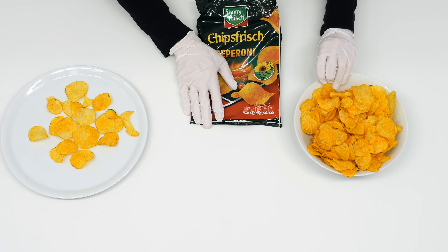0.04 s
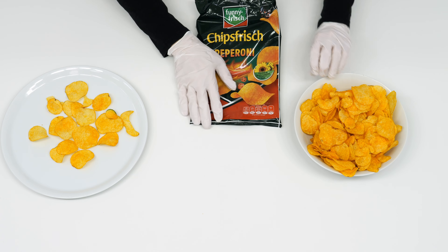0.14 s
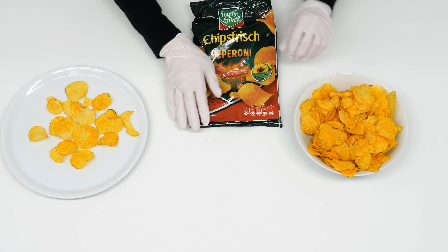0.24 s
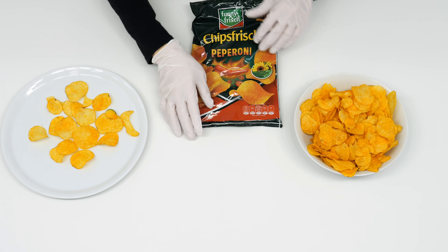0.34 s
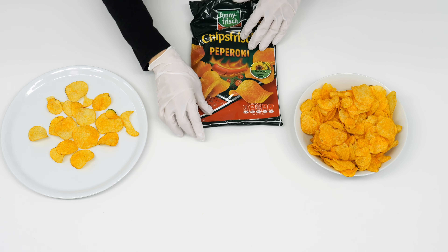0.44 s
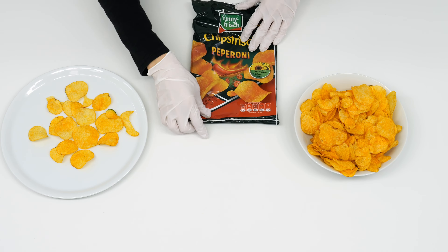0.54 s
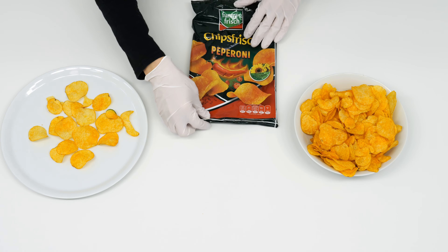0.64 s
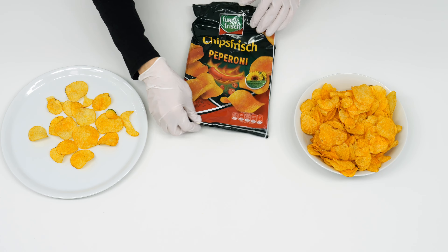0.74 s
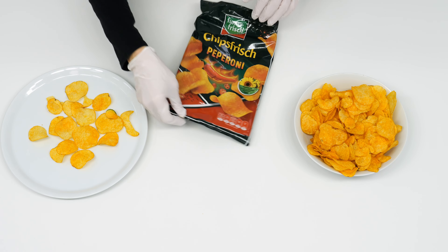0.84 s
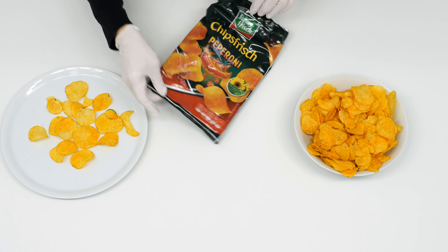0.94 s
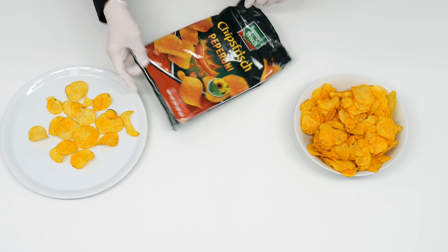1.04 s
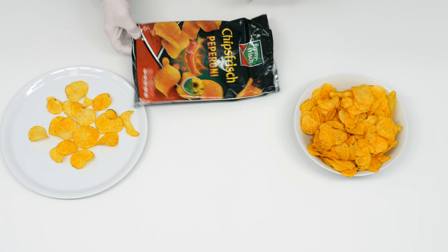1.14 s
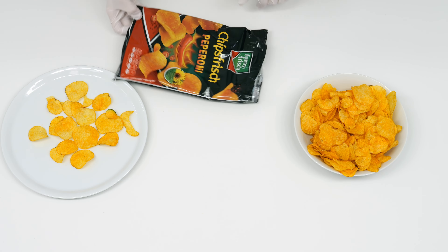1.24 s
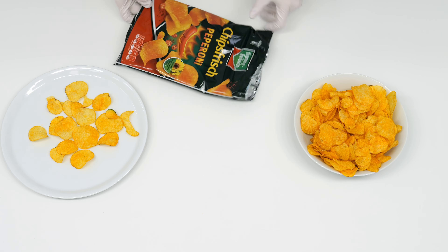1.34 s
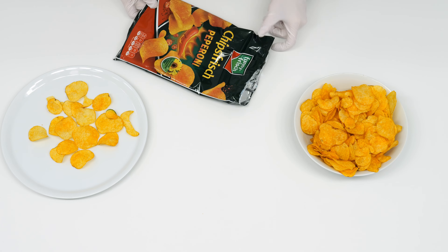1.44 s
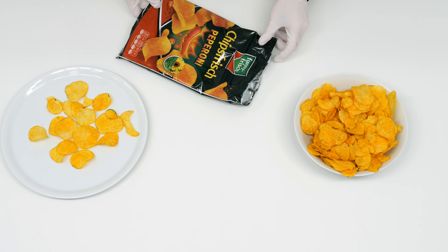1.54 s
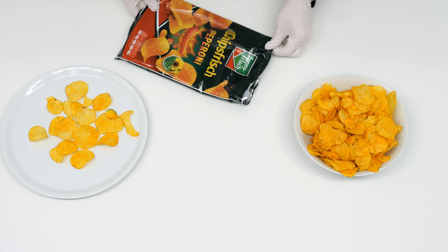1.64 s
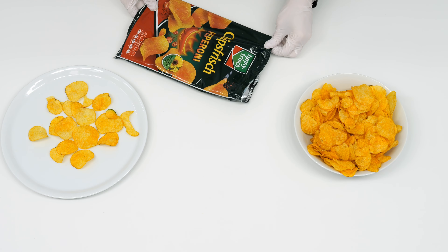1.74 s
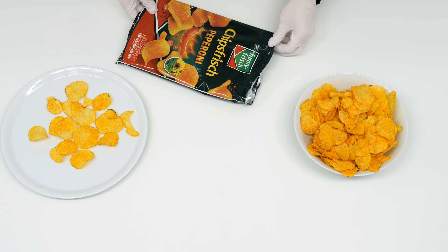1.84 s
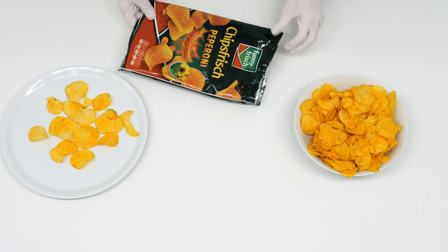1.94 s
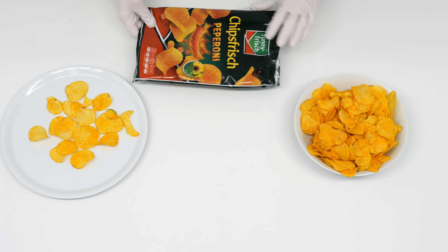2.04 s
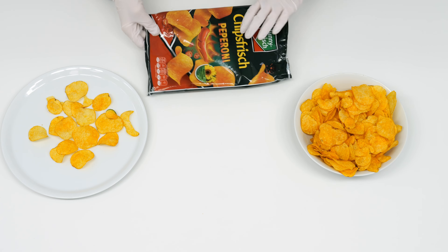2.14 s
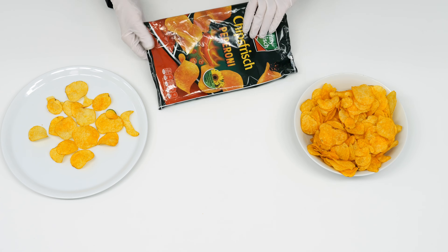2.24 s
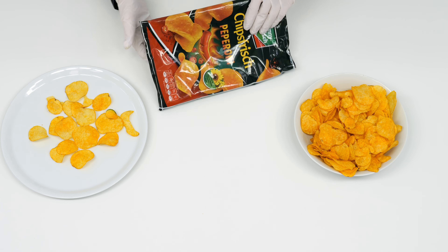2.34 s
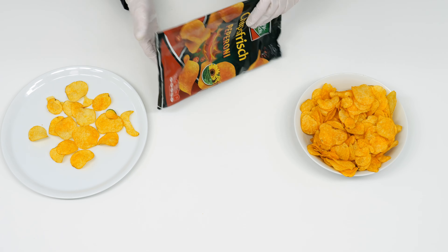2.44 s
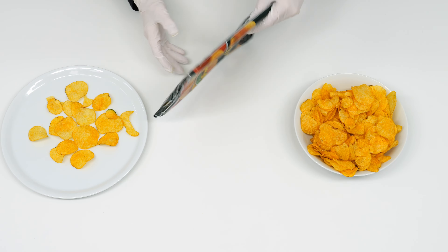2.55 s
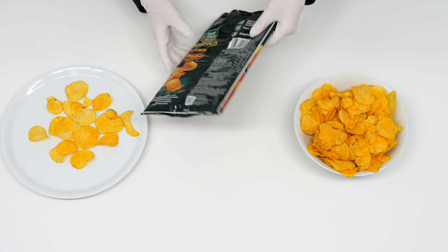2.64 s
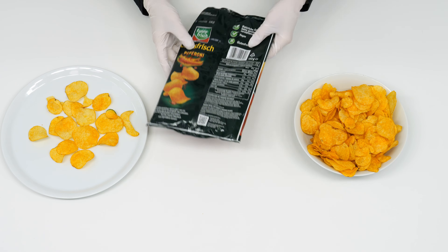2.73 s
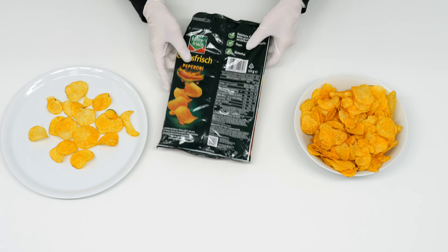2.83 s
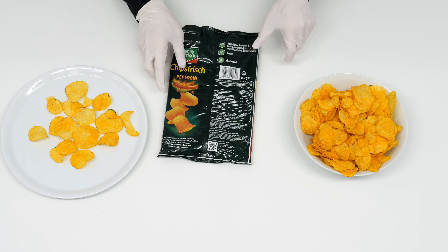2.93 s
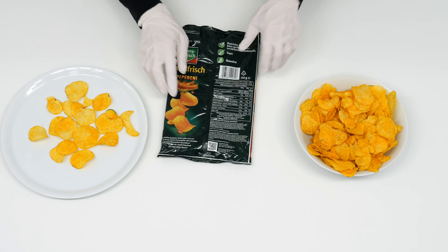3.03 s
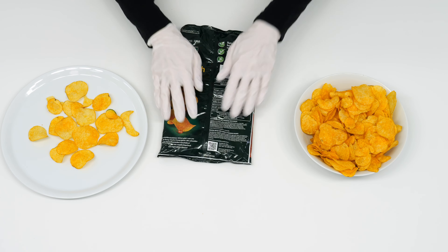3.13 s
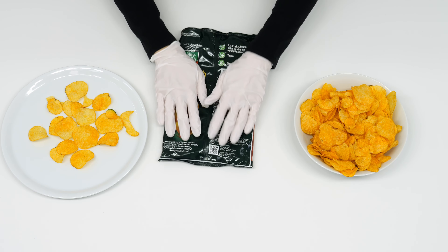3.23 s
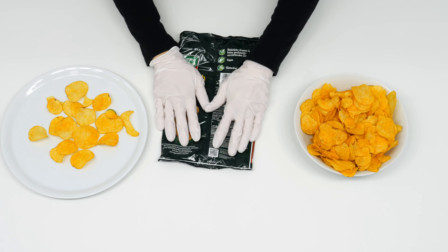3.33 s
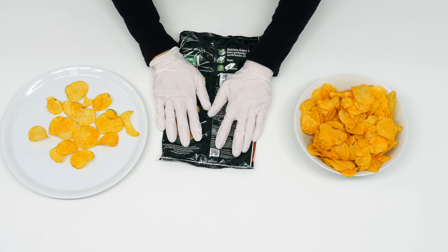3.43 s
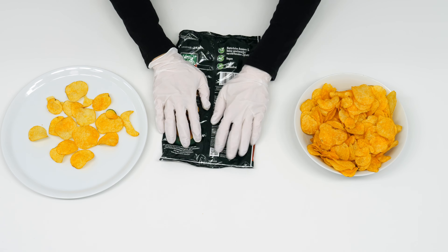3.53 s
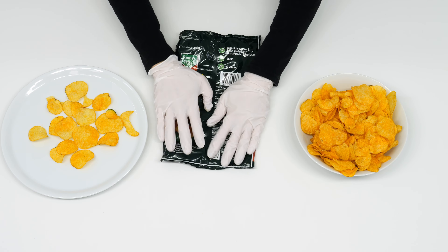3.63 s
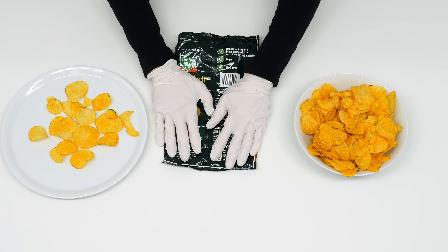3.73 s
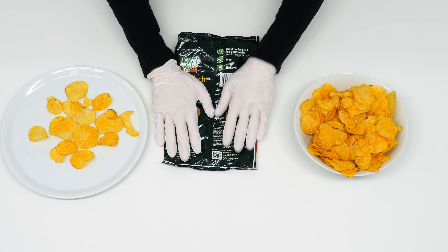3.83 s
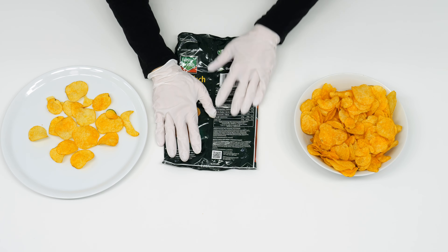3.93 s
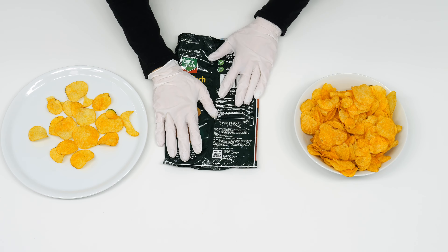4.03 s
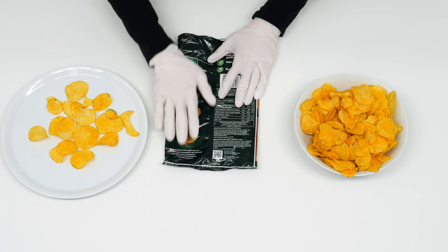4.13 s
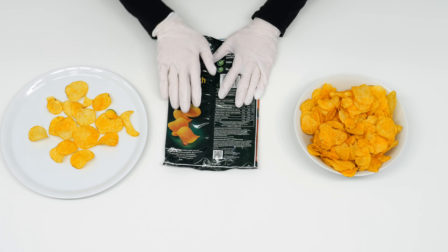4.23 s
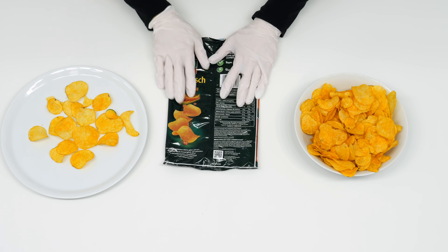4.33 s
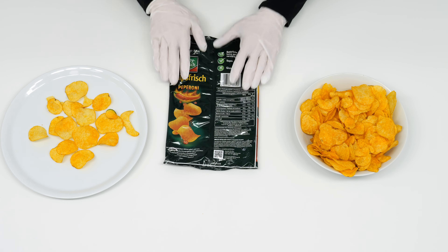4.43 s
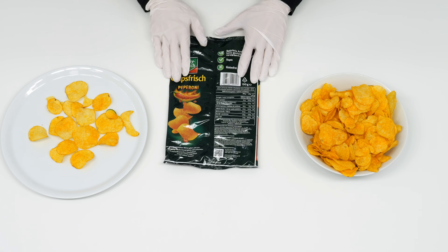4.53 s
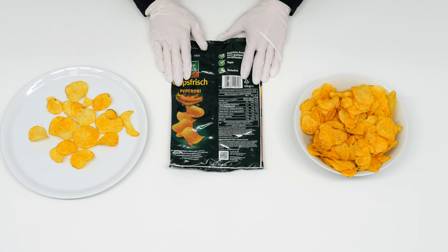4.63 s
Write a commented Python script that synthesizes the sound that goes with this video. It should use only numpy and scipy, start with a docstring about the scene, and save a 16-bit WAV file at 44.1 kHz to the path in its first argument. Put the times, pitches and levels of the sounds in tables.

```python
"""Handling a foil snack bag

In a small room, gloved hands slide a bag over a table, turn it over, press it flat and hold it.
The foil buckles in single snaps, in bursts when a fold gives way, and in a fine crackle as it is worked.
Sliding makes it rasp, the table booms under bag and palms, and air hisses out of the pressed bag."""
import sys
import numpy as np
from scipy import signal
from scipy.fft import rfft, irfft, next_fast_len
from scipy.io import wavfile
from scipy.ndimage import uniform_filter1d

SR = 44100
rng = np.random.default_rng(int(sys.argv[2]) if len(sys.argv) > 2 else 0)


def output_pcm(signal):
    """Save a mono or channel-first signal as 16-bit PCM at the path in sys.argv[1].

    Samples are clipped to [-1, 1] before scaling.
    """
    pcm = np.clip(np.atleast_2d(signal).T, -1, 1) * 32767
    wavfile.write(sys.argv[1], SR, np.round(pcm).astype(np.int16))


N = 355446
TIME = np.arange(N) / SR
COARSE_TIME = TIME[::SR // 1000]   # about one point per millisecond


def from_db(db):
    """Turn decibels into a number to multiply a sound by."""
    return 10 ** (np.asarray(db) / 20)


def at_hz(points, hz):
    """Read a table at the given frequencies, with all octaves equally wide."""
    freqs, values = np.transpose(points)
    return np.interp(np.log(np.maximum(hz, 1)), np.log(freqs), values)


def in_time(rows, when):
    """Read a curve at the given times."""
    return np.interp(when, *np.transpose(rows))


def add(track, sound, time_s):
    """Mix a short sound into a stereo track."""
    start = int(np.clip(time_s * SR, 0, N - 1))
    track[:, start:start + sound.shape[1]] += sound[:, :N - start]


def level_curve(spells, rise_db_per_s, fall_db_per_s, rest_power=0):
    """Join spells of sound that swell, last a while and fade into rows of (time [s], level [dB])."""
    t, power = COARSE_TIME, 1e-14 + rest_power
    for start, length, first_db, last_db in spells:
        end = start + length
        db = np.interp(t, [start, end], [first_db, last_db])
        db = db - rise_db_per_s * np.maximum(start - t, 0) - fall_db_per_s * np.maximum(t - end, 0)
        power = power + from_db(db) ** 2
    return np.c_[t, 10 * np.log10(power)]


def stereo_spectrum(size, alike_hz=1500):
    """The spectrum of white noise, with left and right alike in the bass and unrelated in the treble."""
    hz = np.arange(size // 2 + 1) * SR / size
    mid, side = rfft(rng.standard_normal((2, size)))
    alike = 0.86 / (1 + (hz / alike_hz) ** 2)
    return hz, np.sqrt(1 + alike) * mid + np.sqrt(1 - alike) * side * [[1], [-1]]


def noise(colour):
    """Stereo noise of strength 1, with bass and treble shaped by a table."""
    hz, white = stereo_spectrum(next_fast_len(N, True))
    shaped = irfft(white * from_db(at_hz(colour, hz)))[:, :N]
    return shaped / shaped.std()


# Tone of the quiet room: (frequency [Hz], relative level [dB])
BACKGROUND_COLOUR = [(25, -3.5), (200, -14.5), (1000, -18), (4000, -24.5), (16000, -32.5)]

def room_tone(level_db=-73):
    """The room has a faint, steady rush, strongest in the bass."""
    return from_db(level_db) * noise(BACKGROUND_COLOUR)


# Tone of the echo from the walls: (frequency [Hz], relative level [dB])
ECHO_COLOUR = [(500, -1.5), (2600, -3.5), (6000, -3.5), (15000, -4.5)]
# How long that echo lasts: (frequency [Hz], time to fade by 60 dB [s])
ECHO_FADE = [(200, 0.65), (1500, 0.45), (4000, 0.52), (14000, .38)]

def room_echo(sound, walls_db=-10.0, first_wall_s=0.0067, near_db=-14, near_fade_s=0.11):
    """Table and hands scatter the sound at once; the walls answer later, each octave fading on its own."""
    t = TIME[:SR]
    hz, white = stereo_spectrum(SR, alike_hz=1200)
    octaves_hz = 125 * 2. ** np.arange(8)
    walls = 0
    for centre, weights in zip(octaves_hz, np.eye(len(octaves_hz))):
        band = irfft(white * at_hz(np.c_[octaves_hz, weights], hz) * from_db(at_hz(ECHO_COLOUR, hz)))
        walls = walls + band * from_db(-60 * t / at_hz(ECHO_FADE, centre))
    walls = walls * np.clip((t - first_wall_s) / 0.0034, 0, 1)
    _, scatter = stereo_spectrum(SR, alike_hz=2500)
    near = irfft(scatter) * from_db(-60 * t / near_fade_s) * (t > .001)
    echo = from_db(walls_db) * walls / np.linalg.norm(walls[0])
    echo += from_db(near_db) * near / np.linalg.norm(near[0])
    return signal.fftconvolve(sound, echo, axes=1)[:, :N]


# Tone of the escaping air: (frequency [Hz], relative level [dB])
HISS_COLOUR = [(65, 0), (200, -34), (700, -17), (1500, -3.5), (5000, -1.5), (16000, -8.5)]
# The palms squeeze the bag: (time [s], length [s], first level [dB], last level [dB])
PALM_SQUEEZES = [(4.7, 0.91, -51.5, -61), (5.65, 0.43, -68, -61)]

def air_leak():
    """Air hisses out of the bag while the palms rest on it."""
    flow = level_curve(PALM_SQUEEZES, rise_db_per_s=74, fall_db_per_s=149)
    return noise(HISS_COLOUR) * from_db(in_time(flow, TIME))


# Notes the table top rings at: (frequency [Hz], relative level [dB], time to fade by 60 dB [s])
TABLE_NOTES = [(28.6, -11, 0.74), (70, -12, .5), (124.1, -2, 0.49), (280, -17, .16)]
# Bag, fingers or palms meet the table: (time [s], boom level [dB], slap level [dB], slap pitch [Hz])
TABLE_BUMPS = [(1.17, -62, -40, 600), (1.236, -43, -37.5, 264), (1.392, -65.5, -40, 450),
               (1.686, -65, -27.5, 498), (2.254, -51, -41, 497), (2.464, -62, -40, 537),
               (2.917, -46.5, -37.5, 287), (3.396, -37.5, -68, 400), (3.682, -39, -43, 400),
               (3.736, -32, -44, 397), (4.034, -50, -54, 350), (4.595, -51.5, -62, 480),
               (6.663, -82, -46, 570), (7.772, -53.5, -59, 600)]

def table_bumps(slap_octaves=0.36, slap_fade_s=0.09, press_s=0.003):
    """The air cushion in the bag gives a soft, hollow slap, and the table top booms."""
    out, t = np.zeros((2, N)), TIME[:SR]
    for start, boom_db, slap_db, slap_hz in TABLE_BUMPS:
        boom = sum(from_db(db - 60 * t / fade) * np.sin(2 * np.pi * hz * t) for hz, db, fade in TABLE_NOTES)
        boom = from_db(boom_db) * boom * (1 - np.exp(-t / press_s))
        band_hz = [slap_hz / 2 ** slap_octaves, slap_hz * 2 ** slap_octaves]
        cushion = signal.butter(2, band_hz, "band", fs=SR, output="sos")
        slap = signal.sosfilt(cushion, rng.standard_normal(SR))
        slap = slap / slap.std() * from_db(slap_db - 60 * t / slap_fade_s)
        add(out, (boom + slap)[None], start)
    return out


# The hands pull the bag aside, turn, lift, flip, flatten, stroke, hold and grip it again:
# (time [s], length [s], first level [dB], last level [dB])
HAND_MOVES = [(.12, .17, -50, -44), (.375, 0.038, -47, -36), (.47, 0.26, -33, -37),
              (.73, .27, -43.5, -39.5), (1.07, 0.031, -38.5, -36), (1.17, .17, -40.5, -44),
              (1.38, 0.19, -34, -54), (1.635, 0.16, -32.5, -38.5), (1.87, 0.26, -32, -47.5),
              (2.18, .12, -34.5, -50), (2.31, 0.13, -42.5, -36), (2.545, 0.089, -33, -42.5),
              (2.71, 0.15, -42.5, -37.5), (2.85, .15, -43.5, -40.5), (3.03, 0.23, -62, -65),
              (3.245, 0.13, -35.5, -25.5), (3.49, 0.1, -33, -28.5), (3.66, 0.061, -33, -32),
              (3.85, 0.42, -35, -50), (4.015, 0.18, -25.5, -50), (4.315, 0.21, -29, -43.5),
              (4.57, .11, -25.5, -42.5), (4.72, 0.5, -55, -62.5), (5.5, .27, -53, -50),
              (5.88, 0.24, -58, -66), (6.36, 0.25, -55.5, -59), (7.12, 0.51, -51.5, -64.5),
              (7.475, .1, -31.5, -45.5), (7.62, .12, -35.5, -51), (7.8, 0.063, -50, -52)]

def handling_db(when, rest_db=-73, after_fold_db=-31):
    """How hard the foil is worked: the hands move it, and each collapsing fold unsettles it briefly."""
    after_folds = [(start + length, 0, db + after_fold_db, db + after_fold_db)
                   for start, length, db, _ in FOLD_COLLAPSES]
    work = level_curve(HAND_MOVES + after_folds, rise_db_per_s=1001.5, fall_db_per_s=481,
                       rest_power=from_db(rest_db) ** 2)
    return in_time(work, when)


# How much of that work goes into sliding instead of wrinkling: (time [s], share [0 to 1])
SLIDING_SHARE = [(.3, 0.14), (.44, 0.94), (.6, 0), (.9, 0.3), (1.13, 0.97), (1.3, 0.34), (2.03, 0.23),
                 (2.2, 0.87), (2.5, 0.11), (2.78, 0.92), (3.28, 0.47), (3.45, 0.07), (4.6, 0.02)]
# Tone of the rubbed bag: (frequency [Hz], relative level [dB])
RASP_COLOUR = [(40, -13.5), (130, -12.5), (400, -10), (900, 0.5), (1450, -2), (2600, -6.5), (7000, -9.5),
               (16000, -34)]

def rubbing(rough_db=6.5, slip_s=.003):
    """Gloves and table stick and slip on the foil, and the hollow bag rasps."""
    jitter = uniform_filter1d(rng.standard_normal(N), int(slip_s * SR))
    slips = from_db(rough_db * jitter / jitter.std())
    sliding = in_time(SLIDING_SHARE, TIME)
    return noise(RASP_COLOUR) * slips * np.sqrt(sliding / np.mean(slips ** 2)) * from_db(handling_db(TIME))


# Tone of a click in the foil: (frequency [Hz], relative level [dB])
FOIL_COLOUR = [(150, -18), (400, -13.5), (800, -7), (1400, -1.5), (2800, 0.5), (5000, -1.5), (9000, -6.5),
               (15500, -14.5)]

def foil_clicks(pitch_hz, ring_db, sharpness, flutter_s, samples=256, lag_s=.00004, stereo_width=0.87):
    """One click of energy 1 per pitch: the foil flutters for an instant, then a small flat patch rings."""
    hz, t = np.arange(samples // 2 + 1) * SR / samples, TIME[:samples]
    draws = rng.standard_normal((len(pitch_hz), 2, samples + 1))
    pitch = pitch_hz[:, None, None]
    # large, low patches move for longer and give less treble
    age = t / (flutter_s * (4000 / pitch) ** 0.35)
    tilt = from_db(-1.28 * np.log2(4000 / pitch) * np.log2((hz + 600) / 4000))
    flutter = draws[..., 1:] * age * np.exp(-age)
    flutter = rfft(flutter / np.linalg.norm(flutter, axis=2, keepdims=True))
    # treble leaves a patch in beams, so each ear gets its own version, a little early or late
    ears = flutter[:, :1] + flutter[:, 1:] * [[1], [-1]] * stereo_width * np.sqrt(hz / 4000)
    delay = 8 / SR + lag_s * draws[:, :1, :1] * [[1], [-1]]
    # the patch flips in or out near the height of the flutter; more sharpness makes it ring longer
    damping = 1j * hz * pitch / sharpness
    ring = damping / (pitch ** 2 - hz ** 2 + damping)
    in_or_out = np.sign(draws[:, 1:, :1])
    flip = in_or_out * from_db(ring_db) * ring * np.exp(-2j * np.pi * hz * flutter_s)
    spectrum = (ears + flip) * tilt * from_db(at_hz(FOIL_COLOUR, hz))
    clicks = irfft(spectrum * np.exp(-2j * np.pi * hz * delay))
    energy = (clicks ** 2).sum(axis=2).mean(axis=1)
    return clicks / np.sqrt(energy)[:, None, None]


def crackle(count=4200, uneven_db=5.0, spread_octaves=0.72, wrinkle_hz=3500, smooth_s=0.028, gain_db=0.6):
    """Thousands of tiny wrinkles click, a few much louder than the rest; together they follow the hands."""
    times = np.sort(rng.uniform(0, N / SR, count))
    sliding = in_time(SLIDING_SHARE, times)
    level_db = handling_db(times)
    # under a light touch the sizes are more uneven, so separate ticks stand out
    spread_db = uneven_db * (1 + .016 * (level_db.max() - level_db))
    sizes = from_db(spread_db * np.minimum(rng.exponential(1, count), 3.5))
    # divide out the clicks' own average power, so that the hands set the loudness
    power = np.bincount((times * SR).astype(int), sizes ** 2, N)
    for _ in range(2):
        power = uniform_filter1d(power, int(smooth_s * SR))
    sizes *= from_db(level_db + gain_db) * np.sqrt((1 - sliding) / (np.interp(times, TIME, power) + 1e-9))
    # a sliding bag bends in larger, lower patches
    pitches = wrinkle_hz * 2 ** (spread_octaves * rng.standard_normal(count) - sliding)
    clicks = foil_clicks(pitches, ring_db=14.0, sharpness=14.0, flutter_s=.00033)
    out = np.zeros((2, N))
    for when, size, click in zip(times, sizes, clicks):
        add(out, click * size, when)
    return out


# Folds giving way: (time [s], length [s], total energy [dB], middle pitch [Hz])
FOLD_COLLAPSES = [(0.356, 0.008, -4.5, 2950), (.436, 0.027, -1, 2090), (.524, 0.008, 1, 3720),
                  (1.657, 0.021, 6.5, 3600), (1.684, 0.0064, 16.5, 2340), (1.692, .018, 11, 2450),
                  (1.904, 0.011, 0.5, 2900), (2.255, 0.036, 7.5, 2680), (3.389, 0.011, 7.5, 3340),
                  (3.664, .023, 11, 2980), (3.72, .018, 13, 3270), (4.03, .017, 5, 3680),
                  (4.322, .018, 1.5, 3920), (4.594, 0.008, -0.5, 3620), (5.427, 0.027, -10.5, 4500),
                  (7.144, .018, -8.5, 3750), (7.74, .022, -4, 3100)]

def folds(count=18, uneven_db=0.5, spread_octaves=0.46):
    """A fold collapses in a quick burst, as each snap sets off the next."""
    out = np.zeros((2, N))
    for start, length, db, hz in FOLD_COLLAPSES:
        times = start + length * (np.arange(count) + rng.random(count) - .5) / count
        sizes = from_db(-uneven_db * rng.standard_normal(count))
        sizes *= from_db(db) / np.linalg.norm(sizes)
        pitches = hz * 2 ** (spread_octaves * rng.standard_normal(count))
        clicks = foil_clicks(pitches, ring_db=4, sharpness=1.6, flutter_s=.00035)
        for when, size, click in zip(times, sizes, clicks):
            add(out, click * size, when)
    return out


# The loudest creases snapping through: (time [s], relative energy [dB], pitch [Hz])
CREASE_SNAPS = [(0.1918, -18, 4350), (0.217, -14.5, 3330), (0.3361, -15, 6460), (.5838, -4, 6000),
                (0.6628, -4, 4330), (0.6935, -13, 5640), (0.832, -3, 4200), (0.9104, -5.5, 4000),
                (1.0746, -14, 4860), (1.112, -9.5, 830), (1.174, -12.5, 2870), (1.2648, -4.5, 1820),
                (1.386, -7, 4560), (1.3953, -6, 2800), (1.4404, -7, 2980), (1.5187, -11, 6350),
                (1.948, -13, 7000), (1.9946, -7.5, 6640), (2.0499, -4, 8900), (2.0921, -7.5, 2500),
                (2.193, -8, 2250), (2.4299, -5, 3300), (2.4649, -2, 6100), (2.5718, -5.5, 8900),
                (2.6338, -8, 7300), (2.769, -17, 4100), (2.8353, -8, 3660), (2.8463, -10.5, 4050),
                (2.9164, -6.5, 4070), (3.2296, -12.5, 4050), (3.32, -6, 7940), (3.3531, 2, 4100),
                (3.4848, -3.5, 4500), (3.6036, -2, 3140), (3.651, 2, 3260), (3.8333, 0, 3240),
                (3.8653, 1, 6260), (3.8912, -1, 2900), (3.9211, -1.5, 2870), (3.9482, -2, 8500),
                (4.1199, -0.5, 4660), (4.1522, -0.5, 3190), (4.3534, -4, 1220), (4.4201, -0.5, 4300),
                (4.4723, 1, 6300), (4.5451, -5, 3800), (4.8324, -20, 4520), (4.89, -19, 1490),
                (4.9676, -23, 1370), (5.3237, -24, 2440), (5.4058, -15, 4130), (5.4885, -6.5, 3650),
                (5.5177, -14.5, 4390), (5.591, -11.5, 4100), (5.6007, -11, 4370), (5.6857, -19, 4950),
                (5.8511, -24.5, 6300), (5.9459, -19.5, 2510), (6.3504, -14.5, 8900), (6.4627, -16.5, 3330),
                (6.6614, -13, 3340), (6.838, -23, 6010), (6.8865, -12, 5650), (6.8978, -14, 4330),
                (7.1124, -11.5, 7500), (7.1646, -10, 4330), (7.2202, -19.5, 2250), (7.259, -13.5, 5000),
                (7.4673, -17, 7900), (7.654, -3, 9350), (7.6861, -7, 4130), (7.9012, -5, 4120),
                (7.9711, -20, 5460), (8.0251, -17, 3480)]

def snaps(loud_ring_db, gain_db=1.5, rebound_db=-9, rebound_s=.0017, spread_octaves=0.27):
    """A crease flips, and a moment later a softer click of another pitch follows."""
    out = np.zeros((2, N))
    _, energy_db, pitch_hz = np.transpose(CREASE_SNAPS)
    pitch_luck, wait_luck = rng.random((len(CREASE_SNAPS), 2)).T
    # a gentle snap shakes little of the foil around it, so its patch rings more purely
    ring_db = loud_ring_db - 0.13 * energy_db[:, None, None]
    flips = foil_clicks(pitch_hz, ring_db, sharpness=11.0, flutter_s=0.000372)
    rebound_hz = np.sqrt(pitch_hz * 2800) * 2 ** (spread_octaves * (2 * pitch_luck - 1))
    rebounds = foil_clicks(rebound_hz, ring_db=6.5, sharpness=12.0, flutter_s=0.00073)
    waits = rebound_s * (.5 + wait_luck)
    for (start, db, _), flip, rebound, wait in zip(CREASE_SNAPS, flips, rebounds, waits):
        add(out, flip * from_db(db + gain_db), start)
        add(out, rebound * from_db(db + gain_db + rebound_db), start + wait)
    return out


def scene(left_db=0.2):
    """The bag lies just left of the middle, on a table in a quiet room."""
    rustle = folds() + crackle() + rubbing() + air_leak()
    # a snap has a clear pitch when heard directly, and less of one in the echo
    direct = snaps(loud_ring_db=13.0) + rustle
    echo = room_echo(snaps(loud_ring_db=7.5) + rustle)
    bag = (direct + echo) * from_db([[left_db], [-left_db]])
    return bag + table_bumps() + room_tone()


def record(dry, cutoff_hz=16100):
    """Peaks beyond full scale are clipped, and the highest treble is cut."""
    treble_cut = signal.ellip(10, .1, 80, cutoff_hz, fs=SR, output="sos")
    return signal.sosfilt(treble_cut, np.clip(dry, -1, 1))


dry = scene()
out = record(dry)
output_pcm(out)
```